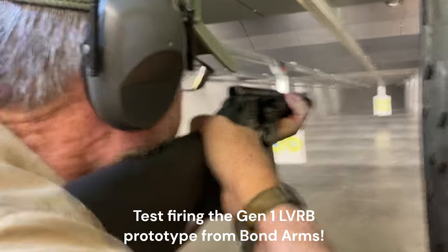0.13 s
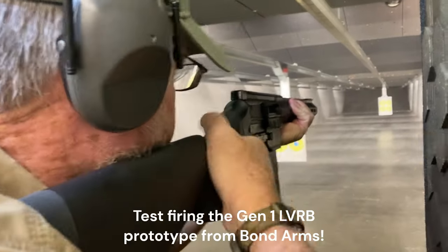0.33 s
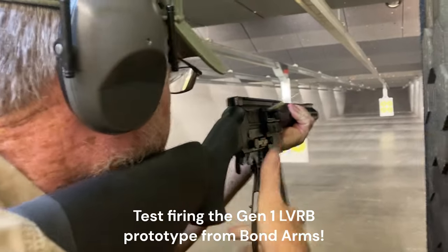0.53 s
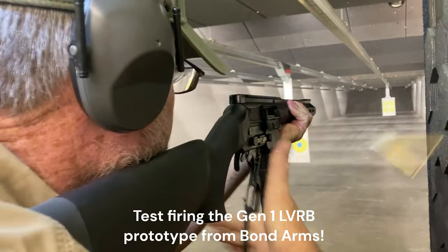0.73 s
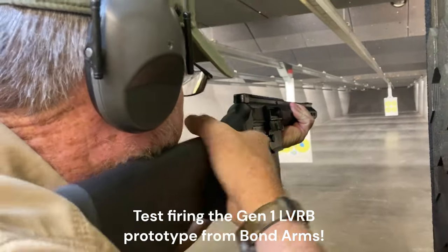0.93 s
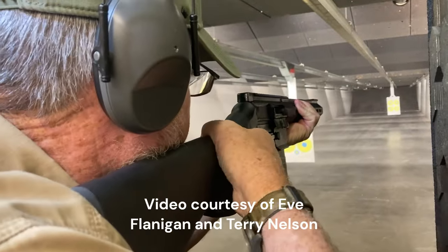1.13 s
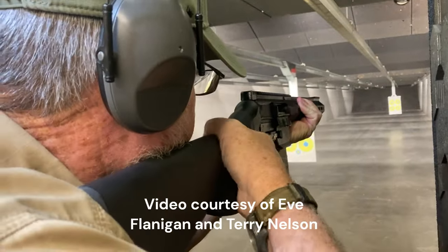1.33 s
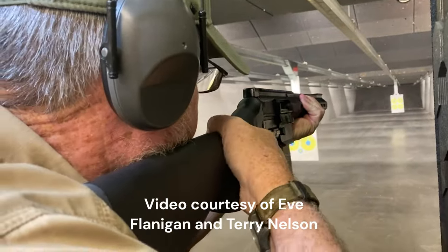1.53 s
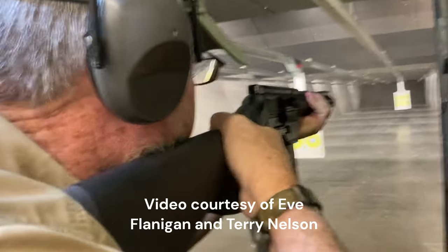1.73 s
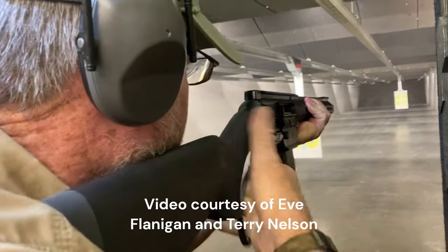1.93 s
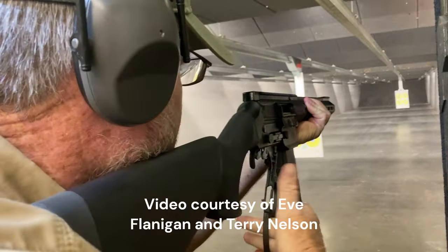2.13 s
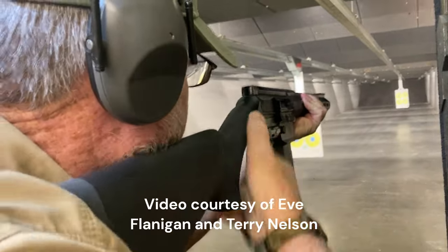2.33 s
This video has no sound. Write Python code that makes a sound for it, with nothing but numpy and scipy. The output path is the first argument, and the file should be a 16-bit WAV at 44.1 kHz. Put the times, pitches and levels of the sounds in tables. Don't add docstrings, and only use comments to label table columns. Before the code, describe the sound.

Two loud rifle shots boom through an indoor range, with quick metallic lever clacks after each

```python
import sys
import numpy as np
from scipy import signal
from scipy.fft import rfft, irfft, next_fast_len
from scipy.io import wavfile
from scipy.ndimage import uniform_filter1d

SR = 44100
rng = np.random.default_rng(int(sys.argv[2]) if len(sys.argv) > 2 else 0)


def unload_audio(sound):
    columns = np.transpose(np.atleast_2d(sound))
    steps = np.round(np.clip(columns, -1, 1) * 32767)
    wavfile.write(sys.argv[1], SR, steps.astype(np.int16))


def gain_from_db(level_db):
    decades = np.asarray(level_db, float) / 20
    return 10 ** decades


N = 110250
BOOM_EDGE_HZ = 865
LEFT_LAG_S = 9.63 / SR


def at_hz(points, hz):
    points = np.array(points)
    return np.interp(np.log(hz), np.log(points[:, 0]), points[:, 1])


def rms_one(x):
    return x / np.sqrt(np.mean(x ** 2) + 1e-20)


BAND_EDGES = 35 * 2 ** np.arange(0, 9.1, 1 / 3)


def bands(size):
    white = rng.standard_normal((2, 2, size))
    hump_edge = signal.butter(6, BOOM_EDGE_HZ, fs=SR, output="sos")
    for k, (lo, hi) in enumerate(zip(BAND_EDGES, BAND_EDGES[1:])):
        sos = signal.butter(2, [lo, hi], "band", fs=SR, output="sos")
        if lo < BOOM_EDGE_HZ:
            sos = np.vstack([sos, hump_edge])
        yield np.sqrt(lo * hi), signal.sosfilt(sos, white[k % 2])


def ring(clicks, hz, t60):
    r = gain_from_db(-60 / (t60 * SR))
    w = 2 * np.pi * hz / SR
    return signal.lfilter([0, np.sin(w)], [1, -2 * r * np.cos(w), r * r], clicks + 1e-18)


def peak(x, hz, q):
    return signal.lfilter(*signal.iirpeak(hz, q, fs=SR), x)


def place(out, sound, s):
    i = int(round(s * SR))
    a, b = max(i, 0), min(i + sound.shape[1], N)
    return out + np.pad(sound[:, a - i:b - i], ((0, 0), (a, N - b)))


# [t/s, level/dB, spread ahead t/s, spread level/dB]
SHOT_TIMES = [
    (-1.413, -6.5, .02, 0),
    (0.150, -9.5, 0.018, -1.5),
    (1.6312, -10.5, .0175, 1.5),
]
SHOT_SAME = 0.84
PULSE_S = 0.000086
FIRST_S = .003


def shots():
    lead_s = .03
    t = np.arange(int(1.6 * SR)) / SR - lead_s
    common, own = hall_answer(t), hall_answer(t)
    pulse = np.where((t >= 0) & (t < PULSE_S), 1 - 2 * t / PULSE_S, 0)
    fade = np.clip((t[-1] - t) / 0.08, 0, 1)
    out = np.zeros((2, N))
    for k, (s, db, ahead_s, ahead_db) in enumerate(SHOT_TIMES):
        blast = np.sqrt((1 + SHOT_SAME) / 2) * common + .5 * pulse
        blast = blast + (-1) ** k * np.sqrt((1 - SHOT_SAME) / 2) * own
        ahead = np.where(t < -FIRST_S, gain_from_db(ahead_db) * (t > -ahead_s), 1)
        out = place(out, gain_from_db(db) * blast * fade * ahead, s - lead_s)
    return out


# [t/s after the shot, level/dB]
FIRST_ECHOES = [
    (-.003, -3),
    (0, 1),
    (.003, 0),
    (.0075, 1),
    (0.0116, 6),
    (0.017, -13),
    (0.023, -9),
    (.035, -16),
]
ECHO_T60_S = 0.023
WALLS_DB, WALLS_T60_S = -10.5, 0.59
CRACK_AHEAD_DB = -2.5


def crack_shape(t):
    echoes = sum(gain_from_db(db - 60 * np.maximum(t - s, 0) / ECHO_T60_S) * (t >= s) for s, db in FIRST_ECHOES)
    walls = gain_from_db(WALLS_DB - 60 * np.maximum(t, 0) / WALLS_T60_S)
    return echoes + np.where(t < -FIRST_S, gain_from_db(CRACK_AHEAD_DB), walls)


def spread_ahead(t, hz):
    reach_s = .022 if hz < 8000 else .008
    db, db_per_s = (-9.5, 1101.5) if hz < BOOM_EDGE_HZ else (-10, 800)
    rise = gain_from_db(db * np.where(t > -FIRST_S, 1, 1.5) + db_per_s * t)
    return np.where(t < 0, rise * (t > -reach_s), 1)


# [f/Hz, level/dB per Hz]
HALL_COLOUR = [(35, -29.5), (60, -15.5), (400, -4.5), (700, -8.5), (900, -28), (3000, -31.5), (8000, -40),
               (16000, -55.5)]
# [f/Hz, t60/s]
HALL_DECAY = [(50, 1.5), (130, 2.89), (350, 1.953), (900, 1.527), (3000, 1.452), (5000, 1.104),
              (9000, 0.92), (15000, 1.4)]
# [f/Hz, width/Hz, level/dB]
BOOM_MODES = [(60, 16.8, 9), (123.3, 13, -1.5), (263.3, 17, 3), (337.5, 16, 1), (392.7, 9.5, -6.5),
              (483, 26, 6), (561.6, 45, 1.5), (679, 45, -7.5), (852, 41, -4.5), (983, 73, 5.5),
              (2000, 30, -2.5), (2450, 8.9, -9), (4147, 1400, 0.5)]
# [f/Hz, level/dB per Hz]
CRACK_COLOUR = [(300, -19), (690, 2), (1700, -12.5), (4000, -23.5), (9000, -17), (16000, -18.5)]
# [f/Hz, width/Hz]
BOOTH_PANELS = [(1200, 120), (1900, 120), (2600, 170), (3500, 190), (4800, 300), (7250, 300)]
# [t/s after the shot, level/dB]
RECORDER_DUCK = [(0, 0), (.1, -2.5), (.2, -3), (.34, -4.5), (.42, -1), (.56, 2.5), (.65, 0), (.9, -1),
                 (1.5, -4.5)]
PANELS_DB, CRACK_DB = -6, -5
BUILD_S_AT_100HZ = 0.025
CRACK_FILL = .3
BURST_DB, BURST_S = 4.5, .006


def hall_answer(t):
    tail = crack = 0
    after = np.maximum(t, 0)
    for hz, noise in bands(len(t)):
        noise = noise * spread_ahead(t, hz)
        fill = 1 - 0.68 * np.exp(-after * hz / 100 / BUILD_S_AT_100HZ)
        decay_db = 60 * (after - .1) / at_hz(HALL_DECAY, hz)
        tail = tail + noise * fill * gain_from_db(at_hz(HALL_COLOUR, hz) - decay_db)
        bursts = rms_one(uniform_filter1d(rng.standard_normal(len(t)), size=int(BURST_S * SR)))
        crack = crack + gain_from_db(BURST_DB * bursts) * noise * fill ** CRACK_FILL * gain_from_db(at_hz(CRACK_COLOUR, hz))
    for hz, width, db in BOOM_MODES:
        r = np.exp(-np.pi * width / SR)
        poles = [1, -2 * r * np.cos(2 * np.pi * hz / SR), r * r]
        tail = tail + gain_from_db(db) * signal.lfilter([(1 - r * r) / 2, 0, (r * r - 1) / 2], poles, tail)
    crack = crack + gain_from_db(PANELS_DB) * sum(peak(crack, hz, hz / width) for hz, width in BOOTH_PANELS)
    early = (t > .05) & (t < .15)
    answer = tail / np.std(tail[:, early]) + gain_from_db(CRACK_DB) * crack_shape(t) * rms_one(crack)
    return answer * gain_from_db(np.interp(t, *np.transpose(RECORDER_DUCK)))


# [t/s, peak level/dB, rattle length t/s, brightness tilt/dB, f/Hz of the part that rings most]
LEVER_CONTACTS = [(0.024, -50, .003, 1.5, 7260), (0.528, -41, 0.0035, -6, 11000),
                  (0.5548, -21, 0.0047, 0, 3830), (0.64, -53, 0.0013, -9, 2050),
                  (0.708, -49, 0.0015, -6, 4500), (0.772, -42, 0.0028, 0, 7400),
                  (0.791, -45, .004, -4, 2700), (0.851, -57, .003, -2, 11100),
                  (0.8582, -31, 0.006, 0.5, 3450), (0.864, -34, .004, 0, 7900),
                  (0.884, -32, 0.005, -3, 7440), (0.89, -35, .004, 0, 11700), (0.898, -37, 0.005, -6, 7900),
                  (2.035, -41, .004, -3, 11000), (2.043, -33.5, 0.0051, -4, 7400),
                  (2.06, -19, 0.0041, -3, 8040), (2.178, -48, 0.0011, -14, 2050),
                  (2.193, -36.5, 0.00083, -11, 4530), (2.268, -54, 0.0023, -4, 11700),
                  (2.278, -40, 0.004, -6, 8000), (2.286, -52, 0.0028, -6, 11100),
                  (2.335, -34.5, 0.0069, -2.5, 11700), (2.351, -31.5, 0.0033, -4.5, 8100),
                  (2.3707, -32, 0.006, 0, 3880), (2.38, -35, .005, -3, 11700), (2.394, -34, .002, -8, 2700)]
# [f/Hz, level/dB, t60/s]
STEEL_MODES = [(1620, -21, 0.0041), (2050, 2, 0.013), (2700, 0.5, 0.0087), (3450, -3.5, 0.014),
               (3950, -6, 0.011), (4540, 1.5, 0.009), (6700, -10, .012), (7550, -6.5, 0.013),
               (8200, 3.5, 0.009), (10030, 11, 0.0064), (11040, -4.5, 0.015), (11700, -7.5, 0.0072),
               (12400, -8, .012), (15100, 0, .015)]
STEEL_DB, TOUCHES_PER_S = -16.5, 1000
SNAP_DB, SNAP_T60_S = -9, .085
CONTACT_S = 0.0026
FAVOUR_DB, FAVOUR_OCTAVES = 10, .2


def lever():
    out = np.zeros((2, N))
    t = np.arange(int(.12 * SR)) / SR
    for s, db, length, tilt_db, part_hz in LEVER_CONTACTS:
        rattle = gain_from_db(-26 * t / max(length, .001) / 3)
        touches = (rng.random(len(t)) < TOUCHES_PER_S / SR) * rng.standard_normal(len(t)) * rattle
        touches[20] = 0.73
        steel = 0
        for hz, mode_db, t60 in STEEL_MODES:
            luck_db = rng.normal(0, 2.5, (2, 1))
            favour_db = FAVOUR_DB * np.exp(-(np.log2(hz / part_hz) / FAVOUR_OCTAVES) ** 2)
            strength = gain_from_db(luck_db + mode_db + tilt_db * np.log2(hz / 6000) + favour_db)
            steel = steel + ring(touches * strength, hz, t60)
        snap_shape = np.minimum(t / CONTACT_S, 1) * (rattle + 0.29 * gain_from_db(-60 * t / SNAP_T60_S))
        snap = rng.standard_normal((2, len(t))) * snap_shape
        edges = [1500 * 2 ** (tilt_db / 6), min(16000 * 2 ** (tilt_db / 8), 17000)]
        snap = signal.sosfilt(signal.butter(2, edges, "band", fs=SR, output="sos"), snap)
        snap = snap + 1.5 * peak(snap, part_hz, 5.0)
        out = place(out, gain_from_db(db) * (gain_from_db(STEEL_DB) * steel + gain_from_db(SNAP_DB) * snap), s)
    return out


# [t/s, ping level/dB, chime level/dB]
BRASS_HITS = [(.006, -51, -53), (.027, -39, -50.5), (.535, -48, -48), (.563, -45, -61), (.652, -58, -62),
              (.705, -36, -51.5), (.93, -70, -66), (1.3857, -8.5, -57), (1.398, -29, -56),
              (2.045, -42, -53), (2.065, -46, -62), (2.194, -50, -54), (2.4295, -32, -60),
              (2.498, -57, -56)]
# [f/Hz, level/dB, t60/s]
PING_MODES = [(15150, 0, .009), (16400, -24, .005), (14360, -16, .006), (13000, -21, .004),
              (12100, -21, .004), (10870, -30, .02), (7350, -46, .012)]
# [f/Hz, level/dB, t60/s]
CHIME_MODES = [(15200, 0, .22), (15310, -3, .15), (15050, -7, .1), (15480, -10, .1), (10860, -19, .3),
               (10930, -26, .12)]
SPLASH_DB, SPLASH_T60_S = -49, .12
WOBBLE, WOBBLE_S = .5, .003


def brass():
    out = np.zeros((2, N))
    hit = np.zeros((2, int(.4 * SR)))
    hit[:, 0] = 1
    t = np.arange(hit.shape[1]) / SR
    ping = sum(gain_from_db(db) * ring(hit, hz, t60) for hz, db, t60 in PING_MODES)
    ping = ping * np.minimum(t / .0008, 1)
    for s, ping_db, chime_db in BRASS_HITS:
        chime = sum(gain_from_db(db + rng.normal(0, 3)) * ring(hit, hz, t60) for hz, db, t60 in CHIME_MODES)
        scatter = rng.standard_normal(hit.shape) * gain_from_db(SPLASH_DB - 60 * t / SPLASH_T60_S)
        splash = sum(gain_from_db(db) * ring(scatter, hz, .004) for hz, db, t60 in PING_MODES)
        wobble = rms_one(uniform_filter1d(rng.standard_normal(len(t)), size=int(WOBBLE_S * SR)))
        case = gain_from_db(ping_db) * (ping + splash) + gain_from_db(chime_db) * chime * (1 + WOBBLE * wobble)
        out = place(out, case, s)
    return out


# [f/Hz, level/dB per Hz]
AIR_COLOUR = [(35, -23), (70, -10), (150, -6), (500, -2.5), (750, -12.5), (1000, -24.5), (3000, -42),
              (4000, -57.5)]
AIR_DB = -54
# [t/s, level/dB]
HISS_LEVEL = [(0, -73), (.14, -79.5), (1.37, -76.5), (1.39, -89.5), (1.49, -95), (1.51, -71.5), (2.5, -72)]


def background():
    air = rms_one(sum(noise * gain_from_db(at_hz(AIR_COLOUR, hz)) for hz, noise in bands(N) if hz < 4000))
    hiss_band = signal.butter(4, [900, 3500], "band", fs=SR, output="sos")
    hiss = rms_one(signal.sosfilt(hiss_band, rng.standard_normal((2, N))))
    hiss_db = np.interp(np.arange(N) / SR, *np.transpose(HISS_LEVEL))
    return gain_from_db(AIR_DB) * air + gain_from_db(hiss_db) * hiss


# [f/Hz, correlation]
PORT_LIKENESS = [(50, .75), (150, .82), (300, .88), (800, .9), (1300, .2), (3000, -.3), (6000, -.3),
                 (7000, -.93), (9000, -.995)]
# [f/Hz, level/dB]
LEFT_COLOUR = [(60, 2.5), (300, 1), (700, .2), (1500, 1.3), (4000, .6), (7000, 0)]


def scene():
    size = next_fast_len(N + 64)
    a, b = rfft(shots() + lever() + brass() + background(), size)
    hz = np.arange(len(a)) * SR / size
    alike = np.clip(at_hz(PORT_LIKENESS, hz + 1), -1, 1)
    left = gain_from_db(at_hz(LEFT_COLOUR, hz + 1)) * a * np.exp(-2j * np.pi * hz * LEFT_LAG_S)
    right = alike * a + np.sqrt(1 - alike ** 2) * b
    return irfft(np.array([left, right]), size)[:, :N]


HOLE_FROM_HZ, HOLE_STEP_HZ, HOLE_HOLD = 6500, 260, 6
HOLE_SHARE, HOLE_RAGGED = .37, .4
HOLE_BELOW_DB, HOLE_GROWS_DB = -24, 5
TOP_HZ, TOP_OPEN_DB = 15950, -12


def treble_holes(x):
    sum_and_difference = np.array([x[0] + x[1], x[0] - x[1]]) / 2
    hz, _, cells = signal.stft(sum_and_difference, SR, nperseg=1024, noverlap=768)
    hz = np.round(hz / HOLE_STEP_HZ)[:, None] * HOLE_STEP_HZ
    turn = np.pi * hz * LEFT_LAG_S
    frames = cells.shape[2]
    luck = rng.standard_normal((2, 24, frames // HOLE_HOLD + 1))
    luck = luck.repeat(HOLE_HOLD, axis=2)[:, :, :frames]
    luck = luck[:, (2 * turn[:, 0] / np.pi).astype(int)]
    power = uniform_filter1d(np.sum(np.abs(cells) ** 2, axis=0), size=3) + 1e-16
    treble_db = 10 * np.log10(np.sum(power * (hz > HOLE_FROM_HZ), axis=0) / np.sum(power, axis=0))
    open_by = np.clip((HOLE_BELOW_DB - treble_db) / HOLE_GROWS_DB, 0, 1)
    width = HOLE_SHARE * hz / 9000 * open_by * np.exp(HOLE_RAGGED * luck)
    weak = np.abs([np.sin(turn), np.cos(turn)]) < np.minimum(width, .8)
    hole = weak & (hz > HOLE_FROM_HZ)
    top = (hz > TOP_HZ) & (treble_db < TOP_OPEN_DB)
    pair = signal.istft(cells * ~(hole | top), SR, nperseg=1024, noverlap=768)[1][:, :N]
    return np.array([pair[0] + pair[1], pair[0] - pair[1]])


def low_pass(x):
    return signal.sosfilt(signal.butter(12, 16840, fs=SR, output="sos"), x)


def record(dry):
    ceiling = .92
    rounded = ceiling * np.tanh(dry / ceiling)
    cut = signal.sosfilt(signal.cheby2(14, 85, 16750, fs=SR, output="sos"), rounded)
    return low_pass(treble_holes(cut))


dry = scene()
out = record(dry)
unload_audio(out)
```